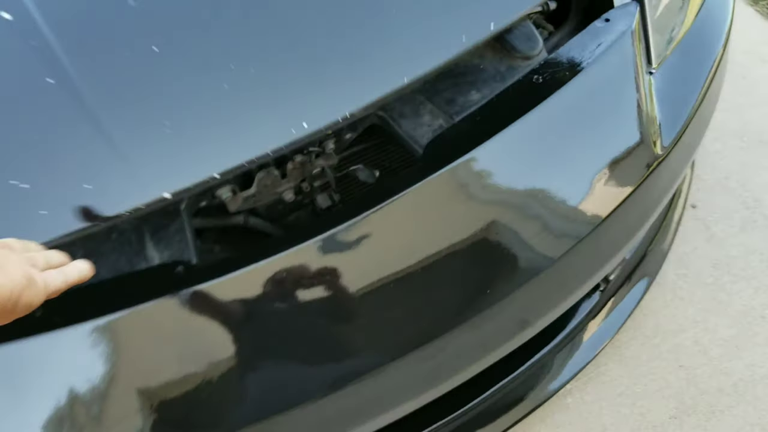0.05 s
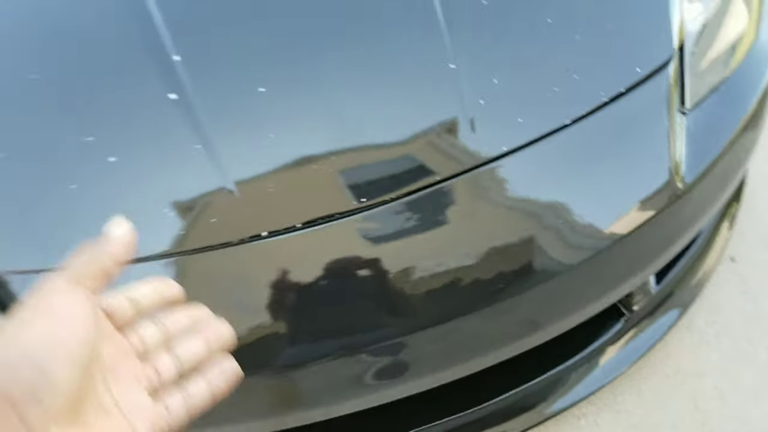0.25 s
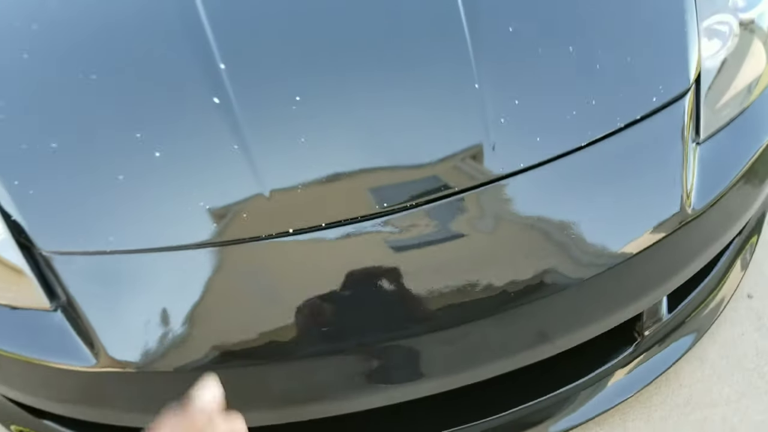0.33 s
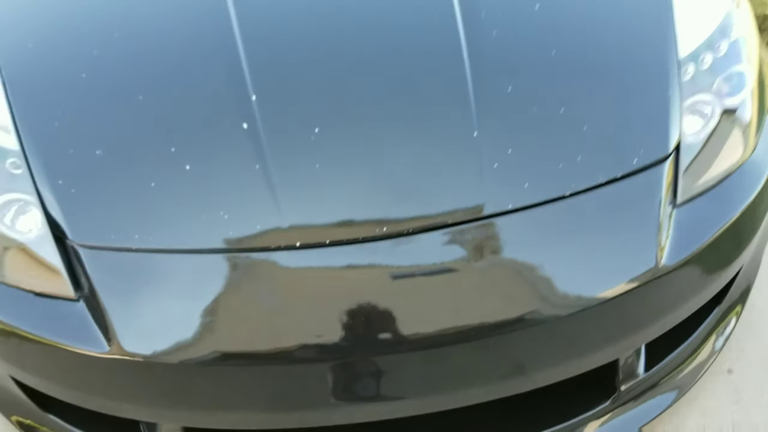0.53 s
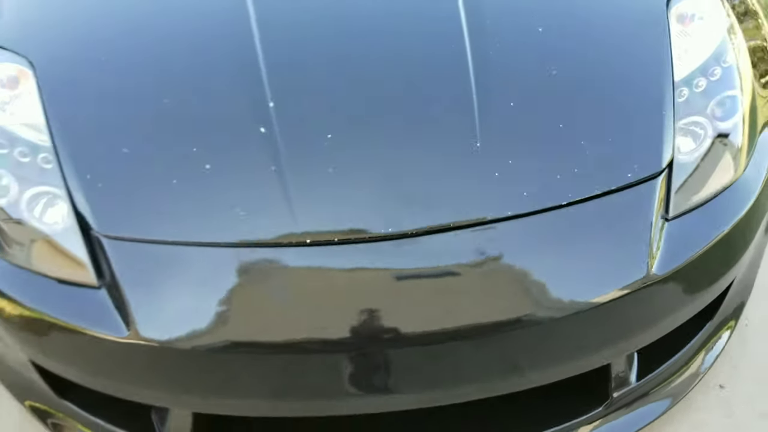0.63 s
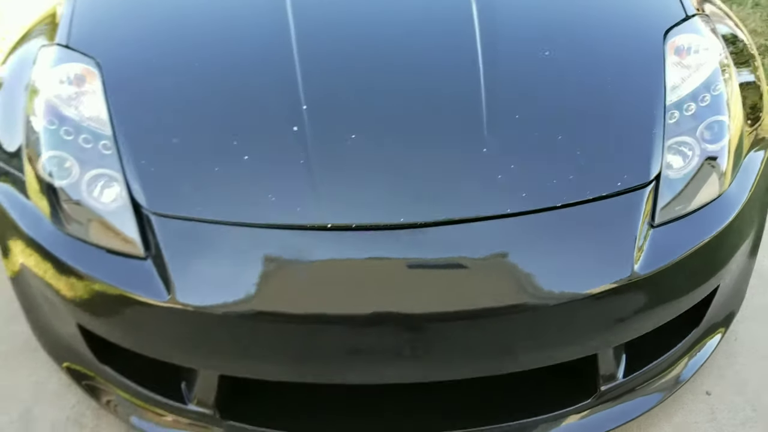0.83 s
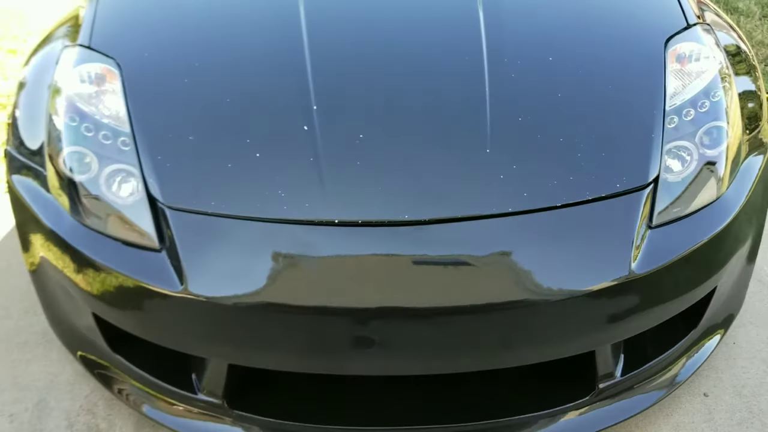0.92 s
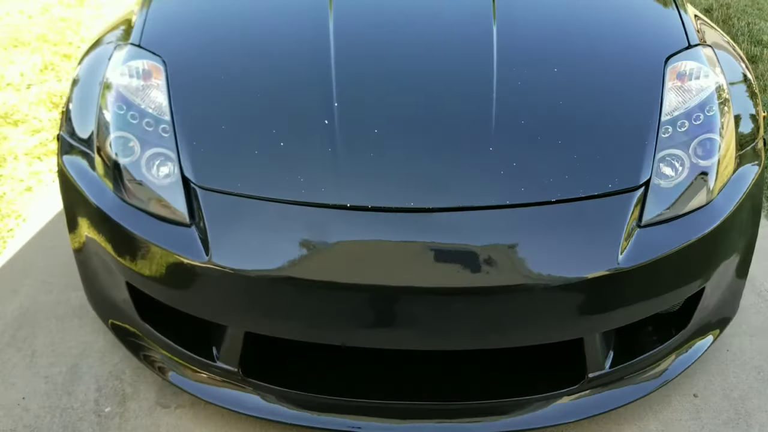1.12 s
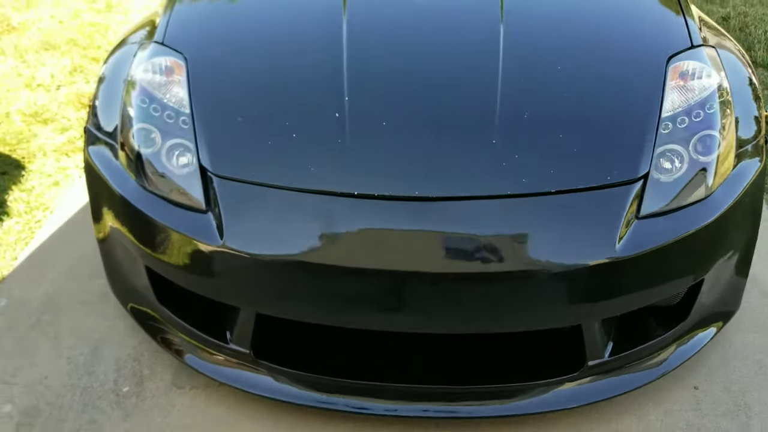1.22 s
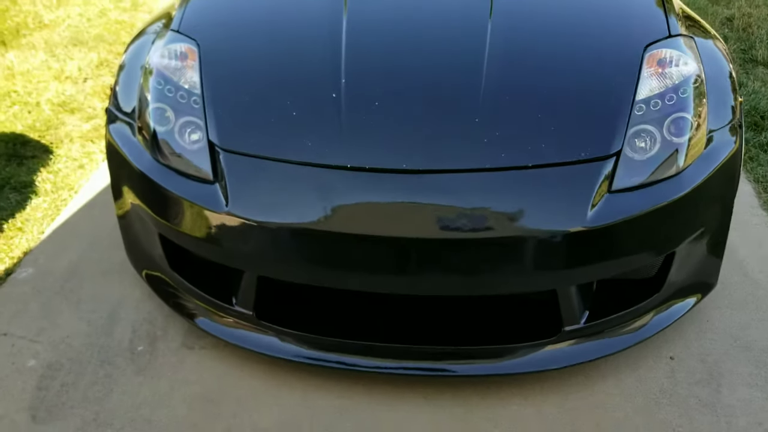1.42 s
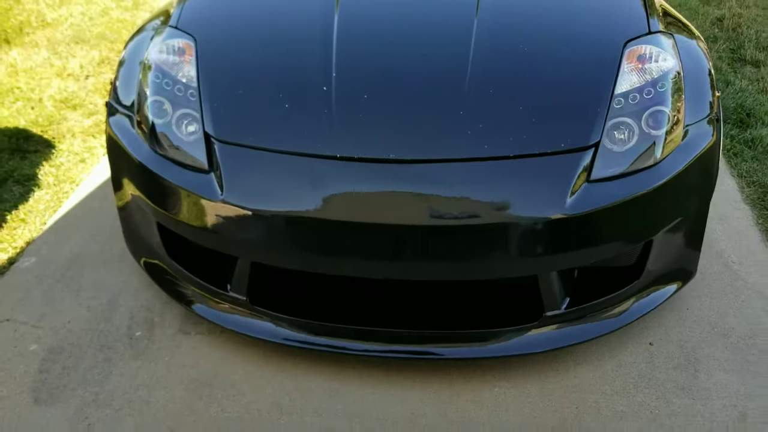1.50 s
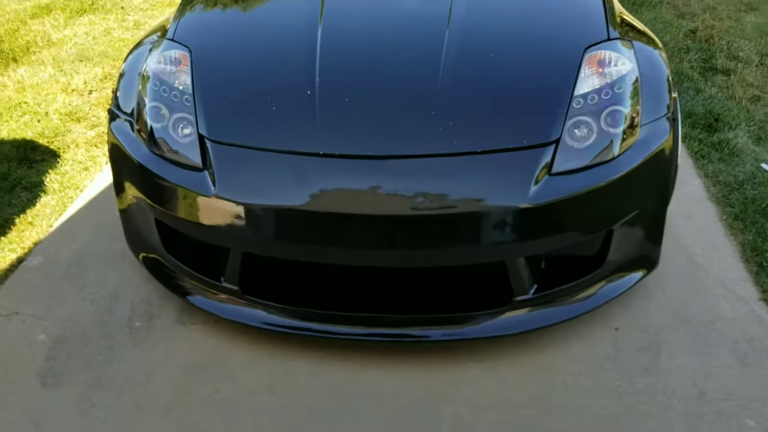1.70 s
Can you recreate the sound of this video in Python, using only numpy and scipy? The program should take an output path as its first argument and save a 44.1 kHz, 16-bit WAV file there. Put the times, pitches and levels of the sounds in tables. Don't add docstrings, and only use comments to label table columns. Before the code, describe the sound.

A car hood slams shut up close with a booming metallic thunk and short ringing rattle outdoors

```python
import sys
import numpy as np
from scipy import signal
from scipy.fft import rfft, irfft
from scipy.io import wavfile
from scipy.ndimage import uniform_filter1d

SR = 44100
rng = np.random.default_rng(int(sys.argv[2]) if len(sys.argv) > 2 else 0)


def ratio(d):
    e = np.asarray(d, float) / 20
    return 10 ** e


def put_to_file(sound):
    columns = np.atleast_2d(sound).T
    safe = np.clip(columns, -1, 1)
    whole_steps = np.round(safe * 32767)
    wavfile.write(sys.argv[1], SR, whole_steps.astype(np.int16))


N = 77175
T = np.arange(N) / SR
F = np.fft.rfftfreq(N, 1 / SR)
LATCH_S, DUCK_S = .2052, .199


def read(table, hz):
    points = np.array(table, float)
    return np.interp(np.log(np.maximum(hz, 1)), np.log(points[:, 0]), points[:, 1])


def unit(x):
    return x / np.sqrt(np.mean(x ** 2))


def hiss(grain_db=0.):
    grain = ratio(grain_db * rng.exponential(size=N))
    return unit(rng.standard_normal((2, N)) * grain)


def colour(x, table):
    return irfft(rfft(x) * ratio(read(table, F)), N)


def band(x, hz, width):
    hz = min(hz, .45 * SR)
    return signal.lfilter(*signal.iirpeak(hz, hz / width, fs=SR), x)


def walk(rate):
    k = int(SR / rate)
    return unit(uniform_filter1d(uniform_filter1d(rng.standard_normal(N), k), k))


def swell(start, attack, hold, t60):
    since = T - start
    release = np.clip(since - attack - hold, 0, None)
    return np.clip(since / attack, 0, 1) * ratio(-60 * release / t60)


def pushes(table):
    out = 0
    for start, db, ms in table:
        pulse = np.sin(np.pi * np.clip((T - start) / (ms / 1000), 0, 1)) ** 2
        out = out + ratio(db) * pulse / pulse.sum()
    return out


def ring(x, modes):
    out = 0
    for hz, db, t60 in modes:
        pole = np.exp(2j * np.pi * hz / SR - np.log(1000) / (t60 * SR))
        out = out + ratio(db) * signal.lfilter([1], [1, -pole], x).imag
    return out


def ports(pair, alike, pan_db=0.):
    # frequency in Hz, left minus right level in dB
    port_db = [(60, 0), (110, 3), (200, 3), (380, 5.5), (700, 4.0), (1290, 5.5), (2380, 4), (4400, -5),
               (8120, 5), (15000, 9.5)]
    shared, differing = rfft(pair)
    likeness = np.clip(read(alike, F), 0, 1)
    lag = 1.5 * np.tanh((F / 1200) ** 2)
    turn = ratio((read(port_db, F) + pan_db) / 2) * np.exp(-.5j * lag)
    mid = shared * np.sqrt((1 + likeness) / 2)
    side = differing * np.sqrt((1 - likeness) / 2)
    return irfft(np.array([(mid + side) * turn, (mid - side) / turn]), N)


def gain_db():
    before_db, back_db_s = 11.5, 1
    return np.where(T < DUCK_S, before_db, back_db_s * (T - LATCH_S))


def town():
    # frequency in Hz, level in dB per Hz
    traffic = [(30, 0.5), (95, 1.5), (250, -14.5), (900, -20.5), (2200, -28.5), (6500, -37), (9000, -39),
               (16000, -45)]
    rumble = ratio(-54.5 + .6 * walk(10)) * unit(colour(hiss(), traffic))
    turn = 2 * np.pi * np.cumsum(1 + .002 * walk(4)) / SR
    hum = ratio(-63.5 + 1.3 * walk(3.8)) * np.sin(240.3 * turn)
    hum = hum + ratio(-65 + 1.5 * walk(5)) * np.sin(184.2 * turn)
    return rumble + hum * np.array([[1], [.3]])


def stir():
    # frequency in Hz, level in dB per Hz
    air = [(40, -5), (118, -4), (300, -15), (500, -24), (1000, -15), (3000, -24), (6500, -28.5),
           (16000, -37)]
    until_landing = np.clip((DUCK_S - T) / .004, 0, 1)
    return ratio(-51 + 1.5 * walk(12)) * unit(colour(hiss(), air)) * until_landing


def shoe():
    # multiple of the main pitch, width in Hz, level in dB
    sole = [(.52, 1200, -6), (.66, 1120, -15.5), (1.0, 619, 2.5), (1.4, 2200, -8)]
    # start in seconds, level in dB, length in ms
    grit = [(1.181, -58, 1.96), (1.1865, -37.5, 5), (1.194, -51, 3.0), (1.21, -40, 2.0), (1.223, -47, 2.5),
            (1.2392, -38, 1.5), (1.258, -47, 1.5), (1.282, -50, 1.56), (1.2872, -38.5, 0.66),
            (1.299, -41.5, .8), (1.3092, -31.5, .9), (1.3165, -43.5, 1.77)]
    drag_s, length_s, drag_db = 1.186, .13, -55.5
    hollow_hz, sag = 4097, 0.087
    air_hz, air_db = 15050, -9.5
    env = ratio(drag_db) * swell(drag_s, 0.0017, length_s, 0.027) * ratio(2.0 * walk(110))
    snaps = sum(ratio(db) * swell(start, .0002, ms / 2000, .003 * ms) for start, db, ms in grit)
    raw = hiss(1.2) * env + np.sign(hiss()) * snaps
    along = np.clip((T - drag_s) / length_s, 0, 1)

    def hollows(main_hz):
        out = 0
        for k, width, db in sole:
            tone = band(band(raw, k * main_hz, width), k * main_hz, width)
            out = out + ratio(db) * tone * np.sqrt(SR / width / 2)
        return out

    scrape = 0
    for p in np.linspace(0, 1, 4):
        scrape = scrape + hollows(hollow_hz * (1 - sag * p)) * np.clip(1 - 3 * abs(along - p), 0, 1)
    return scrape + 3 * ratio(air_db) * band(band(raw, air_hz, 2200), air_hz, 2200)


def rustles():
    # start in seconds, length in seconds, level in dB, centre in Hz, width in Hz
    puffs = [
        (.120, .006, -54, 5500, 4000),
        (.122, .016, -46.5, 1806, 1590),
        (.125, .016, -48.5, 3487, 2400),
        (.690, .014, -61, 4240, 8000),
        (1.41, .008, -67.5, 2400, 2000),
        (0.172, .008, -57.5, 2700, 1500),
    ]
    out = 0
    for start, length, db, hz, width in puffs:
        puff = unit(band(band(hiss(2.0), hz, width), hz, width))
        out = out + ratio(db) * puff * swell(start, length / 3, length, 3.0 * length)
    return out


def slam_tail():
    # frequency in Hz, level in dB per Hz
    tail_colour = [(60, -30), (120, -11), (280, -11.5), (700, -20.5), (2000, -30), (4500, -33.5),
                   (7000, -33.5), (16000, -45.5)]
    # frequency in Hz, t60 in seconds
    tail_t60 = [(50, .5), (150, 0.36), (500, 0.4), (1500, 0.49), (4000, .45), (8000, 0.31), (16000, .3)]
    rise_s, late_db, late_stretch = .02, -11.5, 2.6
    spec = rfft(unit(colour(hiss(), tail_colour)))
    tail = 0
    for hz in 45 * 2 ** np.arange(0, 9, .5):
        octaves = np.log2(np.maximum(F, 1) / hz)
        part = irfft(spec * np.cos(np.pi * np.clip(octaves, -.5, .5)) ** 2, N)
        t60 = read(tail_t60, hz)
        fade = swell(LATCH_S, rise_s, 0.0037, t60)
        fade = fade + ratio(late_db) * swell(LATCH_S, rise_s, 0.0057, t60 * late_stretch)
        tail = tail + part * fade * ratio(1.0 * walk(40))
    return ratio(-19.5) * tail


def latch_crash():
    # frequency in Hz, level in dB per Hz
    crash_colour = [(180, -37.5), (300, -9.5), (900, -2), (1500, -10), (2000, -5), (2900, -8.5), (4500, -5),
                    (16000, -18.5)]
    attack_s = .0015
    crash = ratio(-11.5) * unit(colour(hiss(2.5), crash_colour)) * swell(LATCH_S, attack_s, .018, .08)
    strike = ratio(-13) * unit(band(hiss(1.3), 4400, 2200)) * swell(LATCH_S, attack_s, 0.0037, .05)
    spark = ratio(-21.5) * unit(band(hiss(2.0), 13500, 6000)) * swell(LATCH_S, attack_s, 0.0064, .02)
    return crash + strike + spark


def hood_body():
    # start in seconds, level in dB, contact in ms
    blows = [
        (.2065, -8.5, 0.95),
        (.217, -10, 1.54),
        (.2275, 5, 1.78),
        (.2435, -2.5, 1.5),
        (.262, -7, 1.63),
        (.280, -12.5, 1.9),
        (0.313, -10.5, 4.9),
    ]
    # start in seconds, level in dB, contact in ms
    seats = [
        (.2145, -12.5, 5.0),
        (.2280, 4.5, 6.7),
        (.2400, -4, 5.0),
        (.2560, -2.5, 11.9),
        (.284, -17.5, 5.0),
        (.3055, -9, 5.5),
    ]
    # frequency in Hz, level in dB, t60 in seconds
    panel = [(172, -9, .3), (193.2, -11, 0.44), (249, -6, .3), (284.1, -4, 0.24), (377, -14, .35),
             (391.7, -12, 0.2), (505.5, -8.5, .4), (553, -17.5, 0.37), (598, -11, 0.12), (772, -9.5, .3),
             (750, -15.5, .3), (800, -18.5, 0.61), (890, -15.5, 0.36), (1077, -16, 0.33)]
    # frequency in Hz, level in dB, t60 in seconds
    boom = [(55.5, -14, 0.8), (77, 1, 0.21), (94.4, -4.5, .22), (118, -10.5, 0.48), (157.2, -13.5, .3)]
    # frequency in Hz, level in dB, t60 in seconds
    braces = [(160.6, 0, 2.47), (181.5, -7.5, 2.8), (321, -12, .9), (360, -15, 3.5), (511, -14.5, 0.2),
              (540, -19, .8), (642, -9.5, 1.3), (790, -19, 1.5)]
    clang = ratio(-17.5) * ring(pushes(blows), panel)
    thump = ratio(-8) * ring(pushes(seats), boom)
    tick = np.where(np.arange(N) == int(LATCH_S * SR), 1., 0.)
    hum_on = ratio(-31.5) * ring(tick, braces) * swell(0, .01, .88, 1.0)
    return clang - thump + hum_on


def hood():
    body = hood_body()
    return np.array([body, .4 * np.roll(body, 60)]) + latch_crash() + slam_tail()


def scene():
    # frequency in Hz, likeness of the ports from 0 to 1
    slam_alike = [(60, 0.88), (250, 0.88), (500, .9), (1000, 0.24), (4000, .7), (12000, 1)]
    # frequency in Hz, likeness of the ports from 0 to 1
    town_alike = [(60, 0.76), (250, 0.99), (500, .75), (1000, 0.13), (4000, .2), (12000, .1)]
    far = ports(town() * ratio(gain_db()) + stir(), town_alike)
    step = ports(shoe(), slam_alike, pan_db=-1.5)
    return far + step + ports(hood() + rustles(), slam_alike)


def roll_off(x):
    return signal.sosfilt(signal.butter(12, 16650, fs=SR, output="sos"), x)


def record(dry):
    # frequency in Hz, gain in dB
    mic = [(1000, 0.5), (6800, -3), (8000, -12.5), (10000, -8), (11800, -9), (14500, -3.5), (15400, -6),
           (16300, -11.5)]
    low_cut_hz, top_hz, ceiling = 55, 15900, 2.2
    low_cut = signal.butter(2, low_cut_hz, "high", fs=SR, output="sos")
    heard = signal.sosfilt(low_cut, colour(dry, mic))
    limited = ceiling * np.tanh(heard / ceiling)
    top_cut = signal.ellip(8, .3, 50, top_hz, fs=SR, output="sos")
    return roll_off(signal.sosfilt(top_cut, limited))


dry = scene()
out = record(dry)
put_to_file(out)
```